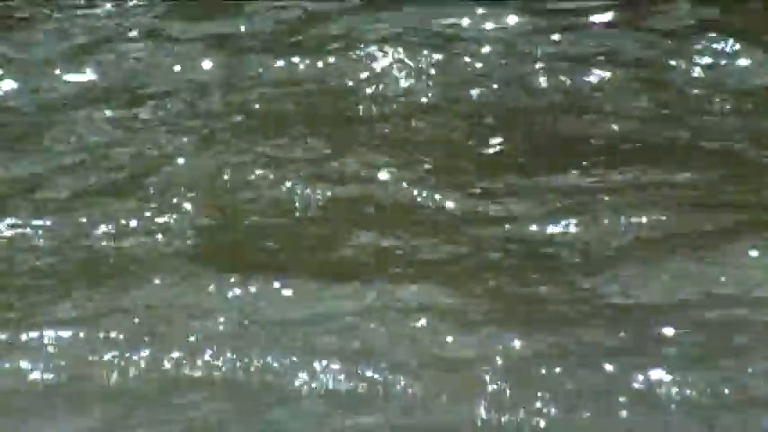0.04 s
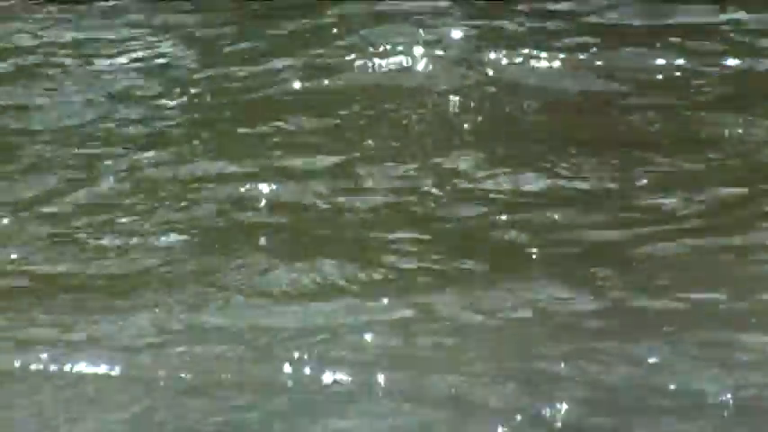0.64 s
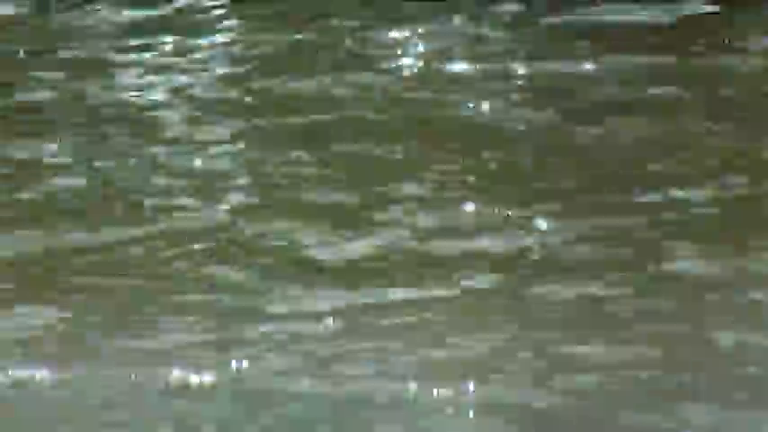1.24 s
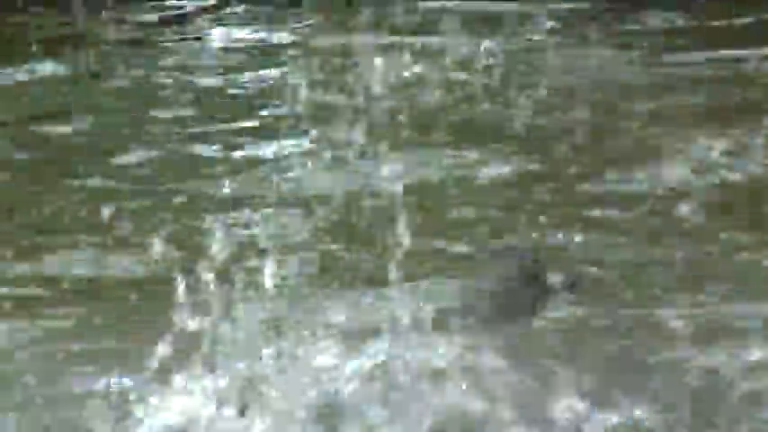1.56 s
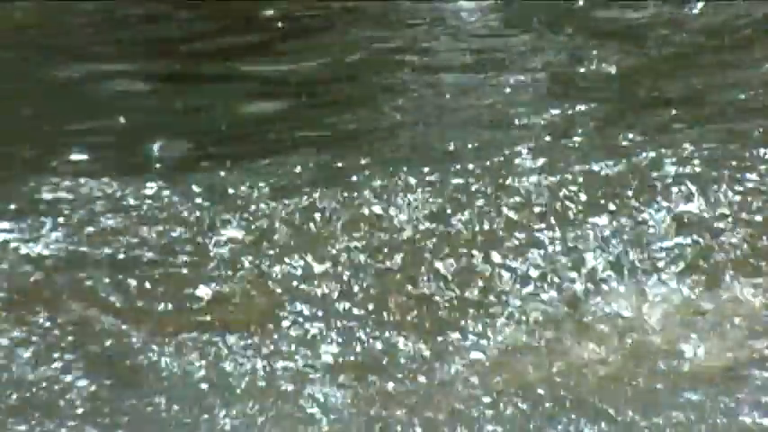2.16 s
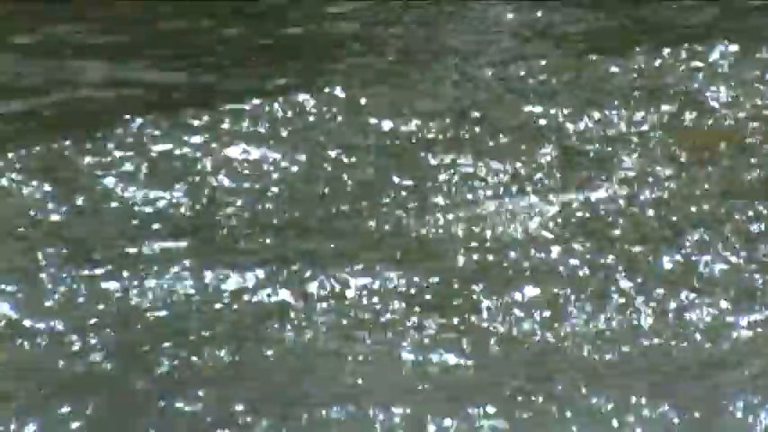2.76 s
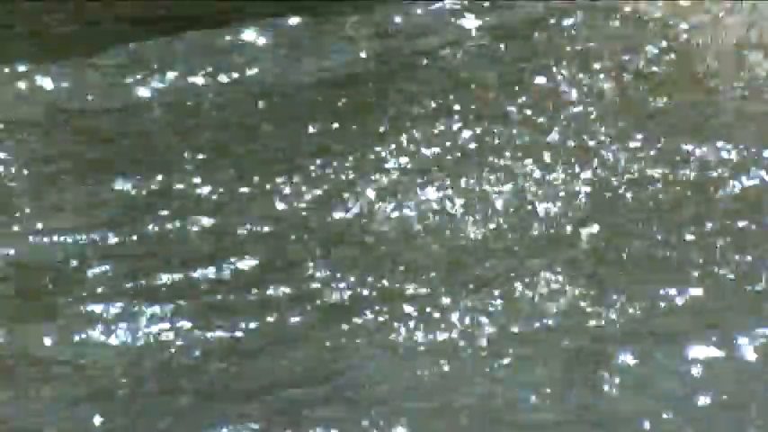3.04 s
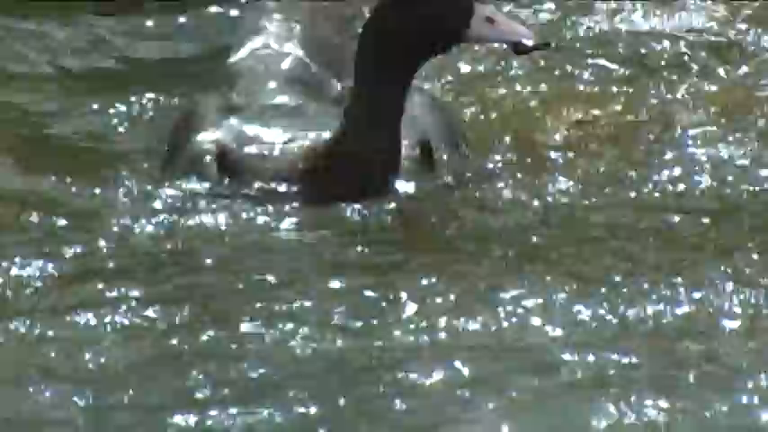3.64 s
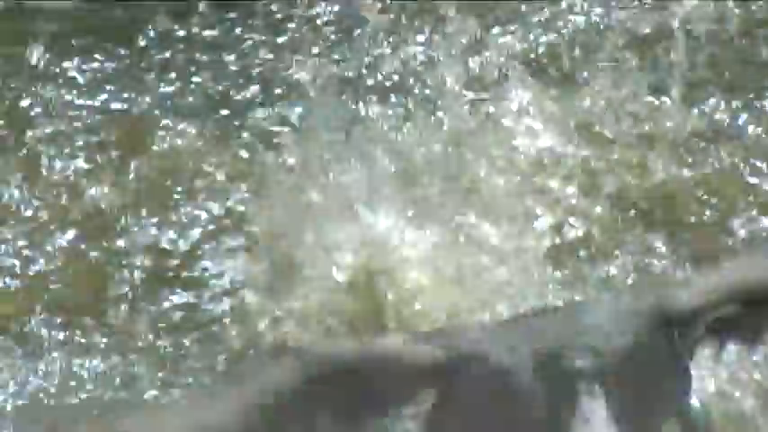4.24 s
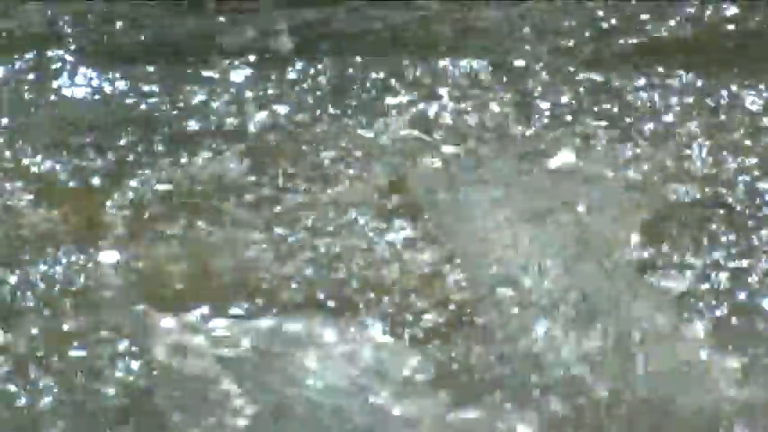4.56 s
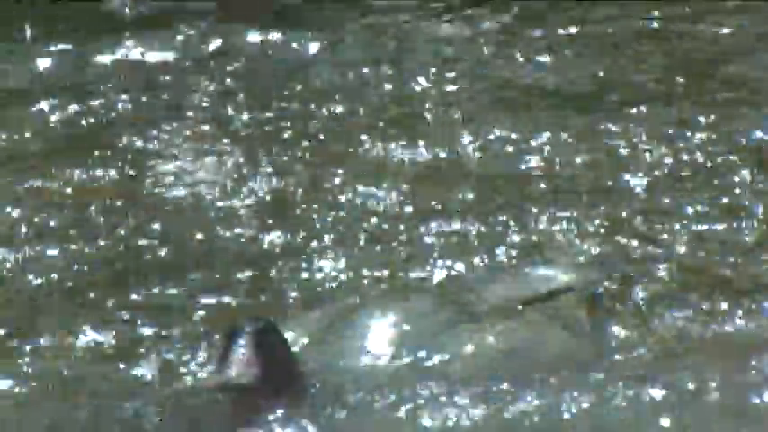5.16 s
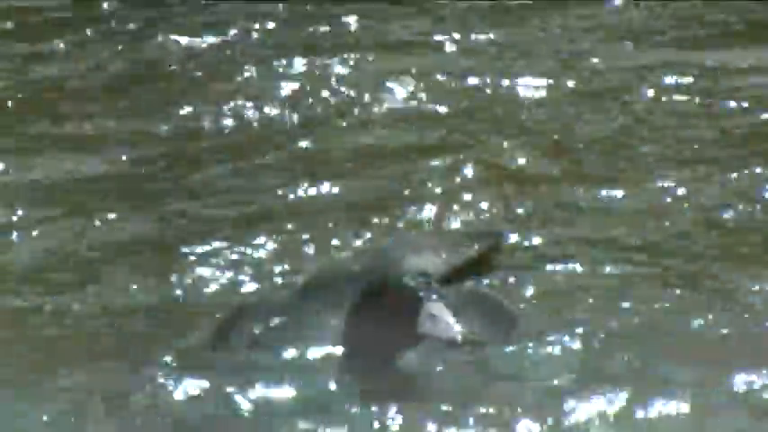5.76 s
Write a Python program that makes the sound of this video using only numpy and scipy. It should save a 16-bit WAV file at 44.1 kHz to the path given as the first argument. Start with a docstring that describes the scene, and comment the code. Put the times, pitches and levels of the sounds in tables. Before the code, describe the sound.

High whistled duck peeps, close on the left, over bursts of splashing, plops and the constant hiss of flowing water.

```python
"""Ducks peeping and diving in a stream

Ducks peep beside the left microphone. Each peep is a near-pure whistle that jumps up from a low
register and falls back into it; one long squeal breaks higher still. Their thrashing throws spray,
churns up ringing bubbles and closes air pockets with a plop, over the steady rush of the stream.
The loudest peeps overload the left channel and crackle."""
import sys
import numpy as np
from scipy import signal
from scipy.fft import rfft, irfft, next_fast_len
from scipy.io import wavfile
from scipy.ndimage import uniform_filter1d

SR = 44100
rng = np.random.default_rng(int(sys.argv[2]) if len(sys.argv) > 2 else 0)


def materialize(psi):
    """Save the field psi as 16-bit PCM at rate SR to the path in sys.argv[1].

    A 1-D psi becomes a single channel; in a 2-D psi each row is a channel.
    """
    bounded = np.clip(np.atleast_2d(psi).T, -1, 1)
    quanta = np.round(bounded * 32767).astype(np.int16)
    wavfile.write(sys.argv[1], SR, quanta)


N = 259749
TIME = np.arange(N) / SR
FFT_SIZE = next_fast_len(N)


# short calls: t/s, duration/s, mid-call f/Hz, fall/Hz, level/dB, onset squeak level/dB,
# low register level/dB, roughness (0-1)
PEEPS = [(0.887, 0.030, 2866, 163, 0.5, 5.5, -19, 0.24), (1.091, 0.040, 2790, 54, -6.6, -2.5, -17.5, .23),
         (1.297, 0.048, 2824, 124, -1.42, -2, -18.5, 0.2), (1.552, 0.045, 2925, 85, -2, -9, -16, 0.15),
         (2.097, 0.037, 2863, 186, -1.9, -2, -17, .15), (2.278, 0.055, 2822, 0, 0.06, -9, -18.5, 0.15),
         (2.493, 0.056, 2856, 130, 2.5, -7, -17, .13), (3.026, 0.035, 2815, 184, -0.45, -1, -18, 0.13),
         (3.212, 0.051, 2843, 42, -5.5, -11.5, -20, 0.11),
         (3.428, 0.056, 2813, 129.5, 1.57, -6, -20.5, 0.13),
         (3.915, 0.056, 2894, 197, -2.5, -3, -21.5, .13), (4.893, 0.024, 2750, 198, -18.5, -31, -35, .08),
         (4.949, 0.039, 2833, 51, -14, -39, -14, 0.2), (5.132, 0.045, 2802, 113, -3.5, -11.5, -19.5, .11),
         (5.317, 0.054, 2945, 125, -4.1, -9.5, -15, .13), (5.689, 0.03, 3032, 118, -5.7, -1.5, -12, .17)]

def peeps(arch_hz=64.74, squeak_hz=4350, squeak_s=.00263):
    """Register jumps: a falling whistle between low notes; returns tone, envelope and roughness."""
    voice, effort, roughness = np.zeros((3, N))
    for t, length, hz, fall_hz, db, squeak_db, low_db, rough in PEEPS:
        glide = [hz - arch_hz + fall_hz / 2, hz, hz - arch_hz - fall_hz / 2]
        tone, envelope = whistle(length + .006, glide, taper=.75)
        add(voice, t - .002, undb(db) * tone)
        add(effort, t - .002, undb(db) * envelope)
        add(roughness, t, np.full(len(tone), rough))
        # the first push overshoots into the top register for a few unsteady cycles
        squeak, envelope = whistle(squeak_s, [squeak_hz, squeak_hz], taper=5.2)
        squeak *= 1 + .3 * rng.standard_normal(len(squeak))
        add(voice, t - .0015, undb(squeak_db) * squeak)
        add(effort, t - .0015, undb(squeak_db) * envelope)
        low_registers(voice, t, t + length, hz, low_db)
        # in a rough call the low register keeps sounding under the main tone
        undertone, _ = whistle(length, [.69 * hz, .69 * hz], taper=.5)
        add(voice, t - .008, rough * undb(low_db + 9) * undertone)
    return voice, effort, roughness


def whistle(length, pitches, taper):
    """Phase integrates frequency: a smooth glide through the pitches; returns tone and envelope."""
    u = np.linspace(0, 1, max(int(length * SR), 8))
    contour = np.polyfit(np.linspace(0, 1, len(pitches)), pitches, len(pitches) - 1)
    envelope = np.abs(np.sin(np.pi * u)) ** taper
    return envelope * sine(np.polyval(contour, u)), envelope


def low_registers(out, start, end, hz, db, ratio=.68, fall=.88):
    """Weak pressure favours lower registers: two steps lead up into a call and two lead out."""
    low = hz * ratio
    add(out, start - .009, undb(db - 6) * whistle(.023, [low * fall, low, low], taper=.58)[0])
    add(out, end - .008, undb(db) * whistle(.023, [low, low * fall], taper=.59)[0])
    for t, glide in ((start - .017, [fall, 1.034]), (end + .00485, [.946, .814])):
        add(out, t, undb(db - 13) * whistle(.014, np.multiply(glide, low * ratio), taper=1.1)[0])


def overtone(voice, throat_hz=6020):
    """Resonance: the second harmonic is heard only where it falls on a narrow mode of the throat."""
    octave = np.real(signal.hilbert(voice, FFT_SIZE)[:N] ** 2)
    return undb(-17) * signal.lfilter(*signal.iirpeak(throat_hz, Q=30, fs=SR), octave)


# partials of the squeal's top register: f/Hz, level/dB
BREAK_PARTIALS = [(3122, -14.5), (3667, -15.5), (3965, -3.5), (4630, -21)]
BREAK_START_S, BREAK_LENGTH_S = 4.392, .079

def register_break(jitter_hz=32, flutter=.17):
    """Random modulation unsteadies a strong partial and its side tones; returns tone and envelope."""
    n = int(BREAK_LENGTH_S * SR)
    window = signal.windows.tukey(n, .15)
    tone = sum(undb(db) * sine(hz + jitter_hz * walk(700)[:n]) for hz, db in BREAK_PARTIALS)
    tone *= 1 + flutter * walk(900)[:n]
    return window * tone, window * sum(undb(db) for _, db in BREAK_PARTIALS)


# pitch contour of the long call: t/s, f/Hz
SQUEAL_PITCH = [(4.028, 2750), (4.069, 2908), (4.1, 2800), (4.127, 2782), (4.165, 2853), (4.222, 2901),
                (4.262, 2879), (4.333, 3012), (4.366, 2975), (4.46, 3016), (4.498, 2815)]

def squeal(full_db=-.52, full_voice_hz=2864, slack_db_per_hz=.105, edge_s=.0078):
    """Level follows pitch: the long call weakens as it slackens; returns tone and envelope."""
    def gate(start, end):
        return np.clip(np.minimum(TIME - start, end - TIME) / edge_s, 0, 1)

    times, hz = np.transpose(SQUEAL_PITCH)
    start, end = times[0], times[-1]
    pitch = np.interp(TIME, times, hz)
    level_db = full_db - slack_db_per_hz * np.maximum(full_voice_hz - pitch, 0)
    arch = gate(start, end) * np.abs(np.sin(np.pi * (TIME - start) / (end - start))) ** .04
    # the main tone gives way during the register break
    broken = gate(BREAK_START_S - edge_s / 2, BREAK_START_S + BREAK_LENGTH_S)
    envelope = undb(level_db) * arch * (1 - broken)
    tone = envelope * sine(pitch * (1 + .004 * walk(250)))
    low_registers(tone, start, end - .006, hz[-1], db=-15.5)
    return tone, envelope


# spectrum of throat turbulence: f/Hz, relative level/dB
RASP_SPECTRUM = [(1000, -37), (1650, -11), (1950, -1.5), (2500, 1), (3350, -12), (3900, -1), (4300, -7),
                 (4850, -3.5), (5400, -14), (6300, -18), (7000, -9), (8200, -30.5), (15000, -43)]

def ducks(squeal_roughness=.115, break_roughness=.15):
    """Turbulence in the throat modulates the amplitude of the whistled calls and adds rasp."""
    voice, effort, roughness = peeps()
    octave = overtone(voice)
    tone, envelope = squeal()
    voice += tone
    effort += envelope
    tone, envelope = register_break()
    add(voice, BREAK_START_S, tone)
    add(effort, BREAK_START_S, envelope)
    add(roughness, BREAK_START_S, np.full(len(tone), break_roughness))
    roughness[roughness == 0] = squeal_roughness
    voice *= 1 + .5 * roughness * walk(700)
    airflow = np.sqrt(np.abs(uniform_filter1d(effort, size=600)))
    rasp = roughness * airflow * colour(rng.standard_normal(N), RASP_SPECTRUM)
    return voice + undb(-1) * rasp + octave


def bank(voice, echo_s=.019, echo_db=-35, tail_db=-37, t60=.26):
    """Reflection and scattering: the water's edge returns a faint echo and a short tail."""
    t = TIME[:SR // 4]
    tail_energy = t60 * SR / np.log(1e6)
    response = rng.standard_normal((2, len(t))) * undb(tail_db - 60 * t / t60) / np.sqrt(tail_energy)
    response[:, int(echo_s * SR)] += undb(echo_db)
    return signal.fftconvolve(voice[None], response, axes=1)[:, :N]


# bouts of diving and paddling: t/s, duration/s, level/dB, depth bias/dB (more heave, less spray)
BOUTS = [(1.158, 0.38, -43.5, 2), (1.474, 0.53, -35, .5), (2.115, 0.14, -42, 3), (2.318, 0.031, -37.5, -7),
         (2.556, 0.11, -53, 7), (2.903, 0.15, -38.5, -2), (3.094, 0.29, -42, -5), (3.505, 0.48, -42, 3),
         (3.963, 0.57, -36.5, -6), (4.593, 0.51, -41, -9.5), (5.153, 0.37, -43, 5),
         (5.64, 0.28, -41.5, 0.5)]

def stirred_db(lag_s, attack_s, t60, share_db, depth_slope, calm_db):
    """Incoherent sources add in power: each bout rises, holds and decays above the calm level."""
    power = np.full(N, undb(calm_db) ** 2)
    for start, length, db, depth_db in BOUTS:
        age = TIME - start - lag_s
        envelope = np.clip(age / attack_s, 0, 1) * undb(-60 * np.clip((age - length) / t60, 0, 2))
        power += (undb(db + share_db + depth_slope * depth_db) * envelope) ** 2
    return 10 * np.log10(power)


# spectra of heaving water, churned bubbles and spray: f/Hz, relative level/dB
HEAVE_SPECTRUM = [(20, -30), (50, -8), (90, -2.5), (150, -5.5), (300, -11), (1000, -57)]
CHURN_SPECTRUM = [(100, 0), (200, -14), (500, -4), (1100, 5.5), (1600, -2.5), (3000, -43), (8000, -45)]
SPRAY_SPECTRUM = [(1200, -10), (2200, 1.5), (3500, 0.5), (4800, -0.5), (7000, -1.5), (8500, -7.5),
                  (10500, -9), (12400, -7.5), (14000, -21), (15500, -16.5)]

def thrashing():
    """Impact, bubble resonance and bulk motion: spray flies at once, bubbles follow, heave peaks last."""
    spray_db = stirred_db(lag_s=0, attack_s=.07, t60=.5, share_db=-.5, depth_slope=-.5, calm_db=-40)
    churn_db = stirred_db(lag_s=.15, attack_s=.01, t60=.5, share_db=-1, depth_slope=0, calm_db=-48)
    heave_db = stirred_db(lag_s=.14, attack_s=.1, t60=.9, share_db=-.5, depth_slope=1, calm_db=-48)
    laps_db = 1.7 * walk(14)
    heave = colour(wide(*rng.standard_normal((2, N))), HEAVE_SPECTRUM)
    froth = [bubbles() + rng.standard_normal(N) for _ in range(2)]
    drops = [droplets(per_s=5000, spread_db=3.5) + .5 * rng.standard_normal(N) for _ in range(2)]
    gurgle_db, flicker_db = 1.6 * walk(45), 1.5 * walk(90)
    return (undb(heave_db + laps_db) * heave
            + undb(churn_db + gurgle_db) * colour(wide(*froth), CHURN_SPECTRUM)
            + undb(spray_db + flicker_db) * colour(wide(*drops), SPRAY_SPECTRUM))


def bubble(hz, cycles, rise=.22):
    """Damped resonance of trapped air, rising in pitch as the bubble nears the surface."""
    u = np.linspace(0, 1, max(int(cycles * SR / hz), 4))
    return np.sin(2 * np.pi * cycles * u * (1 + rise * u / 2)) * undb(-45 * u)


def bubbles(count=3000, low_hz=170, high_hz=2400, spread_db=2.8):
    """Superposition of small bubbles ringing at random times and pitches; rms 1."""
    out = np.zeros(N)
    for when, pitch, faintness in rng.random((count, 3)):
        hz = low_hz * (high_hz / low_hz) ** pitch
        db = -spread_db * np.log(faintness + .035)
        add(out, when * TIME[-1], undb(db) * bubble(hz, cycles=9))
    return unit(out)


def droplets(per_s, spread_db):
    """Shot noise: dense independent clicks, mostly tiny, a few up to 14 dB larger; rms 1."""
    size = undb(np.minimum(spread_db * rng.exponential(size=N), 14))
    lands = rng.random(N) < per_s / SR
    return unit(lands * size * rng.choice([-1, 1], N))


# slaps on the surface: t/s, peak level/dB, t60/s, lower band edge f/Hz
SLAPS = [(.066, -20, .012, 4000), (.563, -20, .01, 4000), (1.503, -26, .08, 250),
         (1.579, -11.5, .029, 4000), (1.942, -27, .05, 900), (2.368, -22, .04, 700),
         (2.861, -16.5, 0.08, 1100), (3.654, -22.5, .045, 1100), (3.889, -16, .017, 4000),
         (4.541, -12.5, 0.014, 3000), (4.621, -8.5, 0.05, 1000), (5.103, -20, 0.049, 4000)]
# air pockets closing: t/s, level/dB, f/Hz
PLOPS = [(1.514, -16.5, 655), (1.522, -21, 450), (1.761, -27, 267), (1.944, -11.5, 1170),
         (2.356, -15.5, 765), (2.365, -19, 840), (2.725, -35, 207), (2.863, -21.5, 1140),
         (4.621, -6.5, 1320), (4.677, -25, 520), (4.72, -29, 403), (4.785, -28, 233), (5.775, -25.5, 270)]

def splashes(stray_drops=22):
    """Impact and air entrainment: slaps and stray drops hit the surface, closing air pockets ring."""
    out = np.zeros((2, N))
    for t, db, t60, low_hz in SLAPS:
        add(out, t, undb(db) * pan(2.5) * slap(t60, low_hz))
    for when, size, side in rng.uniform(-1, 1, size=(stray_drops, 3)):
        drop = undb(-24 + 1.5 * size) * slap(t60=.014, low_hz=3500)
        add(out, abs(when) * TIME[-1], pan(4 * side) * drop)
    for t, db, hz in PLOPS:
        add(out, t, undb(db) * bubble(hz, cycles=7.8))
    return out


def slap(t60, low_hz, top_hz=9000, attack_s=.00057):
    """A brief impact has a broad spectrum: a noise burst as water hits water; peak 1."""
    t = TIME[:SR // 10]
    burst = rng.standard_normal(len(t)) * undb(-60 * t / t60) * (1 - np.exp(-t / attack_s))
    band = signal.butter(1, [low_hz, top_hz], "band", fs=SR, output="sos")
    burst = signal.sosfilt(band, burst)
    return burst / np.abs(burst).max()


def thump(start_s=2.05, attack_s=.08, t60=.63, hz=180, db=-23.5):
    """Antiphase: a low thump shortly after 2 s pushes the microphones opposite ways."""
    band = signal.butter(2, [hz / 1.3, hz * 1.3], "band", fs=SR, output="sos")
    rumble = unit(signal.sosfilt(band, rng.standard_normal(N)))
    age = np.maximum(TIME - start_s, 0)
    envelope = np.minimum(age / attack_s, 1) * undb(-60 * np.maximum(age - attack_s, 0) / t60)
    return undb(db) * envelope * rumble * np.array([[1], [-1]])


# spectra of the stream's low rush and high hiss: f/Hz, relative level/dB
RUSH_SPECTRUM = [(18, -47), (30, -35), (80, -1.5), (232, -25.5), (289, -17.5), (418, -23.5), (455, -13),
                 (607, -18), (694, -19), (1560, -18), (1700, -26), (2210, -64), (3740, -120)]
HISS_SPECTRUM = [(1000, -50), (1700, -29), (1800, -23), (1930, 0.5), (2100, -5), (2600, -3), (3370, 0.5),
                 (3730, -7), (4530, -5), (5020, -8.5), (6440, -1.5), (10900, -11.5), (12600, -6.5),
                 (15500, -17)]

def stream(rush_db=-44.5, hiss_db=-42.5):
    """Broadband flow noise with a fine patter, in two bands that swell gently and independently."""
    mid, side = (rng.standard_normal(N) + undb(-5) * droplets(per_s=2700, spread_db=4) for _ in range(2))
    water = wide(mid, side)
    rush = undb(rush_db + 1.2 * walk(12)) * colour(water, RUSH_SPECTRUM)
    hiss = undb(hiss_db + .6 * walk(12)) * colour(water, HISS_SPECTRUM)
    return rush + hiss


def far_whistle(start_s=.665, length_s=.1, hz=1920, db=-42):
    """A faint pure tone from further along the water, fluttering in amplitude."""
    out = np.zeros(N)
    add(out, start_s, undb(db) * whistle(length_s, [hz, hz], taper=.75)[0])
    return out * (1 + .21 * walk(81))


# likeness of the water at the two microphones: f/Hz, correlation (0-1)
WATER_CORRELATION = [(60, 1), (130, 0.46), (600, 0.75), (1400, 0.64), (3100, 0.9), (15000, .92)]

def wide(mid, side):
    """Partial coherence: the weighted sum and difference of unrelated sounds give left and right."""
    correlation = np.clip(on_bins(WATER_CORRELATION), 0, .99)
    common = rfft(mid, FFT_SIZE) * np.sqrt(1 + correlation)
    opposed = rfft(side, FFT_SIZE) * np.sqrt(1 - correlation)
    return irfft(np.array([common + opposed, common - opposed]), FFT_SIZE)[:, :N]


def colour(x, spectrum):
    """Filtering multiplies spectra: shape x by (f/Hz, level/dB) points; rms 1."""
    return unit(irfft(rfft(x, FFT_SIZE) * undb(on_bins(spectrum)), FFT_SIZE)[..., :N])


def on_bins(points):
    """Interpolate (f/Hz, value) points at the FFT bins, on a log-frequency axis."""
    hz, value = np.transpose(points)
    return np.interp(np.log(np.fft.rfftfreq(FFT_SIZE, 1 / SR) + 1), np.log(hz), value)


def walk(per_s):
    """Smooth random wander; rms 1."""
    hold = max(int(SR / per_s), 1)
    steps = np.repeat(rng.standard_normal(N // hold + 1), hold)
    return unit(uniform_filter1d(steps, hold)[:N])


def sine(hz):
    """A tone with the given instantaneous frequency."""
    return np.sin(2 * np.pi * np.cumsum(hz) / SR)


def add(out, start_s, sound):
    """Superpose a sound at a given time."""
    i = max(int(start_s * SR), 0)
    out[..., i:i + sound.shape[-1]] += sound[..., :max(N - i, 0)]


def pan(db):
    """Left and right gains for a level difference."""
    return undb(np.array([[db], [-db]]) / 2)


def undb(db):
    """Decibels to amplitude ratio."""
    return 10 ** (np.asarray(db) / 20)


def unit(x):
    """Scale to rms 1."""
    return x / np.sqrt(np.mean(x ** 2))


def scene(ducks_right_db=-17):
    """Level difference gives direction: the ducks are at the left microphone, the water lies ahead."""
    voice = ducks()
    calls = (voice + bank(voice)) * undb([[0], [ducks_right_db]])
    return calls + far_whistle() + stream() + thrashing() + splashes() + thump()


def record(dry, overflow_above=1.057, spike_depth=1.3, top_hz=15900):
    """Saturation and overflow: peaks flatten at full scale and positive overshoots spike downward."""
    x = signal.resample_poly(dry, 320, 441, axis=1)  # to 32 kHz
    overflow = (x > overflow_above) * (np.arange(x.shape[1]) % 2)  # on alternate samples only
    spikes = signal.convolve(overflow, np.array([[.26, 1, .26]]), "same")
    flattened = x / (1 + np.abs(x) ** 12) ** (1 / 12)
    crackling = signal.resample_poly(flattened - spike_depth * spikes, 441, 320, axis=1)[:, :N]
    lowpass = signal.firwin(255, top_hz, fs=SR)
    return signal.fftconvolve(crackling, lowpass[None], "same", axes=1)


dry = scene()
out = record(dry)
materialize(out)
```